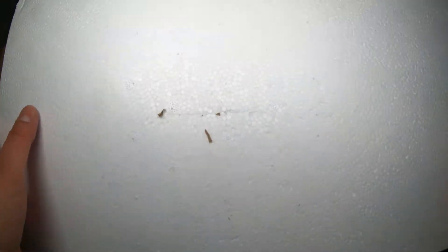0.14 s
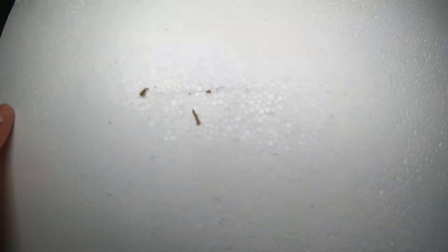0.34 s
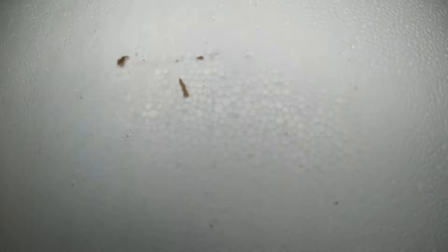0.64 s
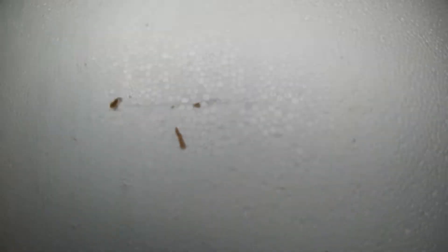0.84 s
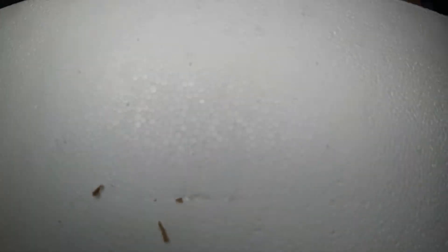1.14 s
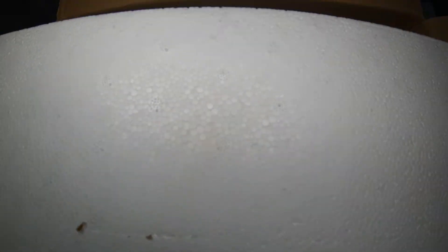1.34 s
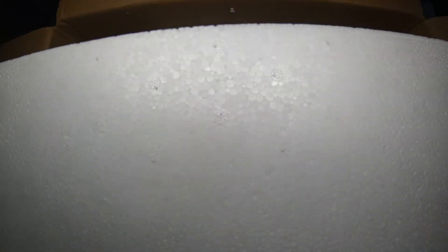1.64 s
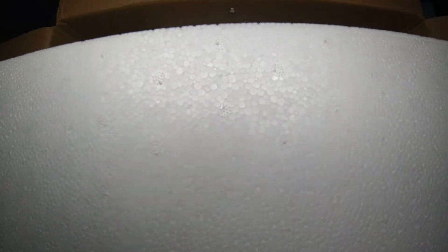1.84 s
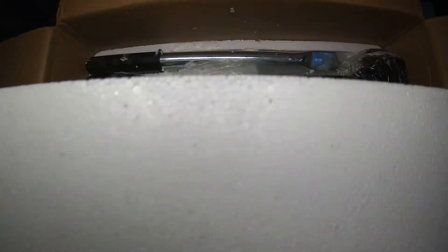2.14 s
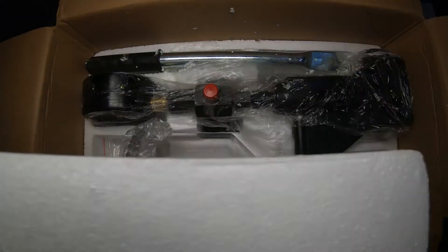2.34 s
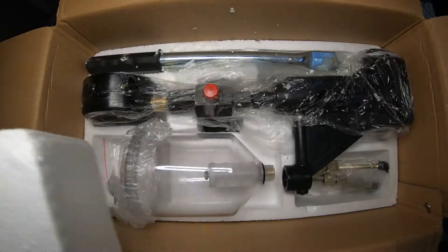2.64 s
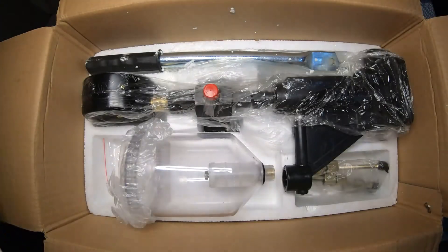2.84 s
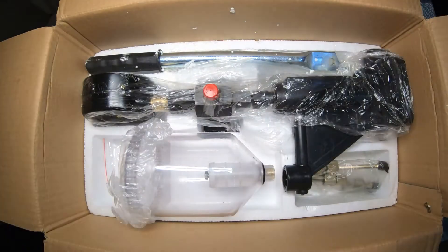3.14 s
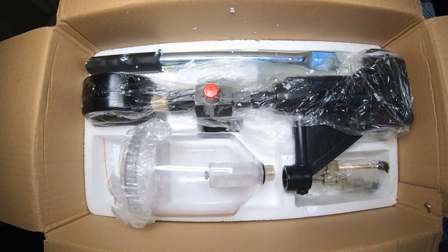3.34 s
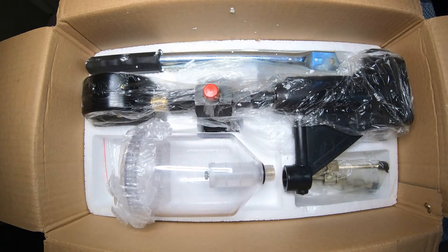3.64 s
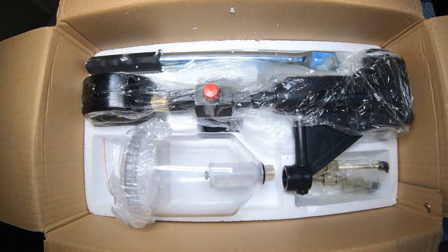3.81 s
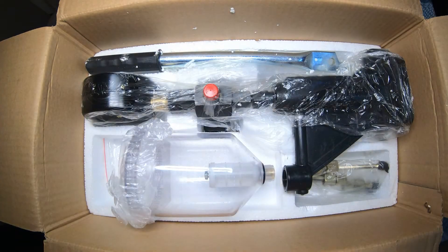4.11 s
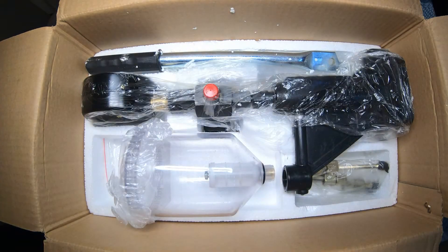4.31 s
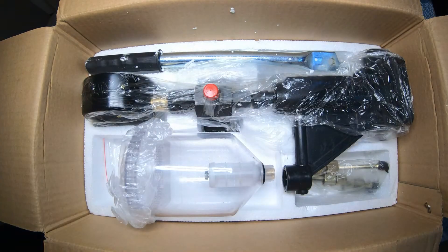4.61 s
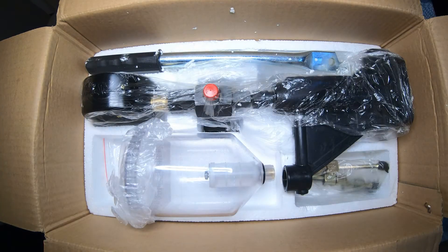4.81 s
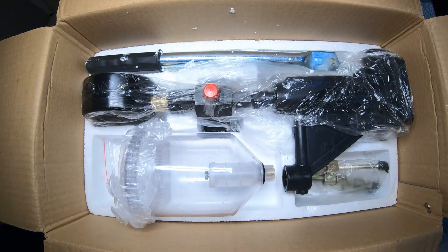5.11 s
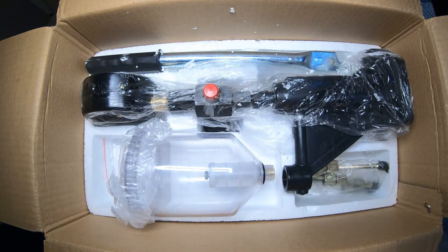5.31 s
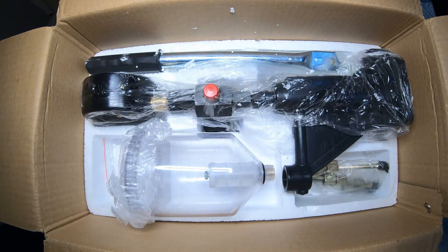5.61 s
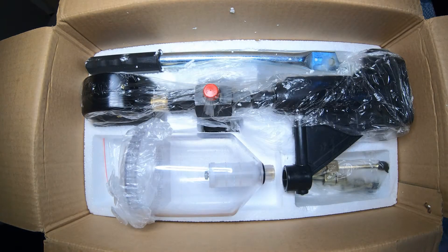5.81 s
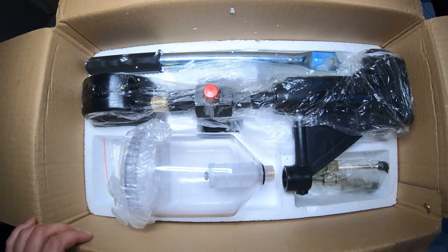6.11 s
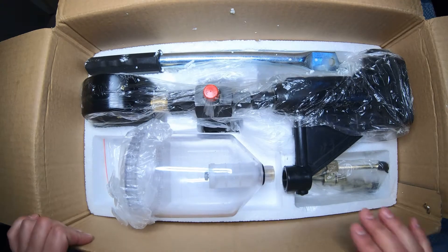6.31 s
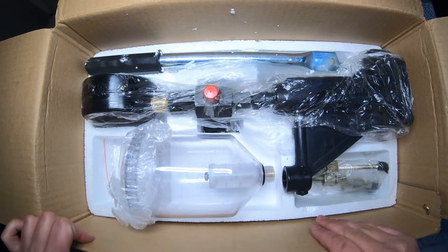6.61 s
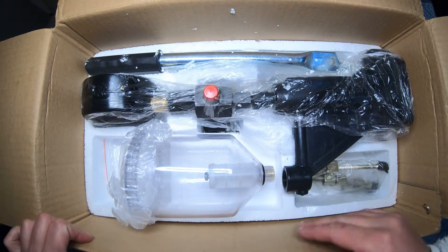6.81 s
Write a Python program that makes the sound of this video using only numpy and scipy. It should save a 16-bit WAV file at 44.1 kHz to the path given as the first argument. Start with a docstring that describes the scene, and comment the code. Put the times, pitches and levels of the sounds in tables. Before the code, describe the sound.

Polystyrene foam squeaks and rasps out of a cardboard box, followed by lighter scraping and hollow knocks on the flaps.

```python
"""In a small, quiet room, a polystyrene foam lid is tugged out of a cardboard box near the microphone.
Stick-slip friction makes it squeak, rasp and judder along the walls. It comes free, bounces on a flap,
slides down beside the box and bumps to rest; then hands brush and knock the flaps.
Each rub is one stroke that swells, holds and dies away; each bump rings the damped modes of the box."""
import sys
import numpy as np
from scipy import signal
from scipy.fft import rfft, irfft, next_fast_len
from scipy.io import wavfile
from scipy.ndimage import uniform_filter1d, map_coordinates

SR = 44100
rng = np.random.default_rng(int(sys.argv[2]) if len(sys.argv) > 2 else 0)


def digitize_waveform(pressure):
    """Quantize a signal to 16-bit integers and store it at the path in sys.argv[1].

    Rows of a 2-D input are taken as channels; values are limited to [-1, 1].
    """
    field = np.atleast_2d(pressure).T
    bounded = np.clip(field, -1, 1)
    quanta = np.round(bounded * 32767).astype(np.int16)
    wavfile.write(sys.argv[1], SR, quanta)


N = 306495

# Position of the contact: (time [s], left minus right [dB])
CONTACT_PAN = [(0.0, 1), (0.66, 0.5), (0.75, -0.5), (0.99, 0), (1.31, -0.5), (1.39, 3.5), (1.51, 0),
               (2.65, 3), (2.88, -4), (3.72, 2.5), (5.34, 2), (5.57, -4), (6.04, 1), (6.95, 2)]
# Spectra of room air, tight rubbing, light rubbing and edge ticks: (frequency [Hz], relative density [dB])
AIR_SPECTRUM = [(15, -36), (25, -15), (68, -11.5), (91, -32.5), (189, -4.5), (235, -6), (392, -16.5),
                (449, -20), (857, -19), (1060, -24), (2200, -23), (2660, -24.5), (7630, -25), (14600, -39),
                (15800, -42)]
TUG_SPECTRUM = [(15, -35), (25, -2), (53, 2.5), (126, -1.5), (211, -9.5), (307, -7), (342, -9),
                (905, -13.5), (1250, -11.5), (1510, -10.5), (3050, -5), (5820, -8), (8050, -4.5),
                (10500, -9), (15800, -23)]
BRUSH_SPECTRUM = [(35, -47), (60, -11), (91, -28), (211, -1.5), (345, -4), (388, 2), (489, 2), (632, 3.5),
                  (1610, -4.5), (3900, -2.5), (5930, -6.5), (7850, -1.5), (10900, -8), (13100, -12.5),
                  (15800, -27)]
TICK_SPECTRUM = [(88, -56), (150, -7), (1300, -3.5), (2120, -8.5), (3590, -2.5), (6570, -6.5), (7530, -2),
                 (8810, -10.5), (13300, -19), (15800, -61)]
# Likeness of left and right: (frequency [Hz], correlation [ratio])
COHERENCE = [(100, 0.86), (300, 0.87), (600, 0.67), (1200, 0.24), (2200, 0.49), (4500, 0.64), (8000, 0.047),
             (14000, 0.11)]
# Tugs on the tight lid: (start [s], attack [s], length [s], release T60 [s], rasp [dB],
# hiss over rasp [dB], board over rasp [dB], wall rumble over rasp [dB])
TUG_STROKES = [(0.0, 0.0017, 0.063, 0.96, -26.5, -0.5, -10, -4.5),
               (0.09, .08, 0.19, 1, -29.5, -8, -13, -21.5), (0.35, 0.01, 0.025, 0.39, -35, 2, -6, -15),
               (0.425, 0.087, .11, 0.15, -28, 1.5, -8, -16),
               (0.555, 0.044, 0.25, 0.1, -31.5, -2, -6.5, -14), (1.055, .02, .06, 0.25, -57, -3, -2, -18),
               (1.11, 0.028, 0.051, 0.34, -43.5, 2, -9, -24), (1.26, 0.012, 0.033, 0.17, -49, -7, -3, -11),
               (1.35, .04, 0.097, .1, -53, -4, -2.5, -10),
               (1.438, 0.0089, 0.08, 0.55, -30.5, -11.5, -1, 4.5), (1.55, .09, 0.13, 0.18, -23, -3, -9, -5),
               (1.71, 0.015, 0.06, 0.13, -36.5, 3, -2.5, -4.5), (1.79, .02, 0.068, 0.15, -39.5, -1, 0, 4),
               (1.865, 0.019, 0.072, .15, -33, 0.5, -4.5, -26),
               (1.932, 0.021, 0.053, 0.27, -23.5, -4.5, -9.5, -24),
               (1.99, 0.025, 0.064, 0.4, -28.5, -3.5, -6.5, -14),
               (2.07, 0.033, .12, 0.064, -35, 3, -15, -5.5),
               (2.319, 0.0046, 0.049, 0.077, -38, 11.5, -11, 3),
               (2.378, 0.011, 0.13, 0.14, -30, 0.5, -8.5, -4.5),
               (2.515, 0.024, 0.058, 0.11, -37, 3, -0.5, -1), (2.605, .015, 0.051, 0.051, -44, 9, -7, -12),
               (2.672, 0.0079, 0.067, 0.15, -38, -3, -4, -12)]
# The foam lets go: (time [s], level [dB], length [s], squawk [Hz], squawk over chatter [dB])
SLIP_BURSTS = [(0.009, -22, 0.015, 3300, 12), (0.047, -21.5, 0.017, 3800, 19),
               (0.448, -23, 0.022, 8400, -2), (0.592, -20, 0.018, 2460, -2), (0.648, -19.5, 0.013, 1880, 2),
               (1.416, -28.5, 0.0096, 2190, 4), (1.441, -21.5, 0.013, 2350, -0.5),
               (1.573, -26.5, 0.048, 1250, 9), (2.135, -25, 0.013, 4200, -3),
               (2.263, -35, 0.021, 6500, -13), (2.335, -21, 0.0026, 2870, 10),
               (2.353, -25, 0.0065, 7500, 8), (2.379, -14.5, 0.0041, 6300, 5),
               (2.484, -21.5, 0.014, 3850, -5), (2.528, -24, 0.016, 4000, -9),
               (2.564, -20, 0.0083, 4500, -13), (2.619, -20, 0.0046, 8250, 11),
               (2.639, -21.5, 0.0074, 7650, 6), (2.681, -24.5, 0.03, 8000, -3),
               (2.702, -22, 0.0069, 2200, 1), (3.41, -20, 0.016, 8140, 1), (3.456, -17, 0.0092, 7440, -25),
               (4.034, -22, 0.032, 8400, -7), (5.311, -25.5, 0.028, 8030, 3)]
# Bumps on the box: (time [s], flap [dB], deep wall [dB], hard knock [dB], pitch of the panel [ratio])
BOX_IMPACTS = [(0.019, -25.5, -17.5, -40, 1.22), (0.639, -31.5, -22.5, -54, 1), (0.940, -52.5, -71, -40, 1),
               (1.460, -25, -16, -20.5, 1.1), (1.63, -23, -21, -16.5, 1), (2.038, -23.5, -44, -21.5, 0.93),
               (2.266, -39, -46, -62, 0.95), (2.382, -26.5, -33, -52, 0.94), (3.417, -29, -26, -29, 1.33),
               (3.464, -29, -27, -29, 0.9), (3.509, -27.5, -58, -33, 1.435), (4.012, -38.5, -55, -24, 1.17),
               (4.898, -12, -50, -15, 1.1), (4.917, -15.5, -37, -18, 1.078), (4.950, -24, -27, -20, 0.93),
               (5.287, -22, -26, -20.5, 1.4), (5.318, -26.5, -28, -28, 0.96),
               (5.364, -26.5, -17, -21.5, 1.01), (5.411, -35, -29, -29.5, 0.99),
               (5.510, -36.5, -56, -55, 1), (5.591, -34.5, -62, -43, 1.034), (6.028, -37, -25, -22, 1.08),
               (6.046, -40, -24.5, -49, 1.6), (6.104, -32.5, -19.5, -25.5, 1.13),
               (6.255, -25.5, -29, -9, 0.99), (6.524, -40, -19.5, -51, 1), (6.547, -40, -29, -30, 1.1),
               (6.648, -36.5, -37, -61, 1.04), (6.825, -39, -41, -42, 1.26), (6.87, -35, -37, -40, 1.2)]
# Modes of the box: (frequency [Hz], level [dB], T60 [s])
BOX_MODES = [(45, -8, 0.13), (67, -3, 0.18), (102.8, -7.5, 0.23), (146.9, 1.5, 0.15), (199.5, -8.5, 0.098),
             (269, -1, 0.084), (381, -3, 0.062), (515, -1.5, 0.035), (668, -12.5, 0.058),
             (786, -14.5, 0.077), (1220, -16, 0.029), (1320, -25, 0.063), (1610, -18, .06)]
# The foam sings as its slips lock into step: (time [s], pitch [Hz])
SQUEAK_PITCH = [(0.035, 3100), (0.072, 4760), (0.107, 5100), (0.122, 5150), (0.128, 4530), (0.141, 4450),
                (0.151, 5100), (0.162, 5250), (0.19, 5150)]
# Sharp contacts of edge on board: (time [s], level [dB], treble [dB])
EDGE_CONTACTS = [(1.233, -28, 5), (2.037, -22.5, -21), (3.507, -16, -12), (3.66, -20.5, -30),
                 (3.745, -20, -19), (4.01, -17, 3), (5.285, -14, -6), (6.027, -19.5, -20),
                 (6.107, -27, -19), (6.254, -15.5, 1), (6.521, -31, -8), (6.717, -35.5, 12)]
# Cardboard under the dragging edge: (time [s], length [s], first pitch [Hz], last pitch [Hz], level [dB])
HOOT_GLIDES = [(2.563, 0.024, 1400, 1420, -42), (3.867, 0.027, 405, 414, -44), (4.001, .015, 634, 663, -36),
               (4.075, 0.0483, 1137, 902, -33.5), (4.157, 0.02, 708, 706, -40),
               (4.211, 0.038, 697, 691, -36.5), (5.389, 0.032, 820, 715, -37.5),
               (6.254, .008, 1650, 1610, -37)]
# Each bounce shakes the box: (flap [dB], deep wall [dB], hard knock [dB], pitch of the panel [ratio])
BOUNCE_IMPACT = (-42, -50, -33, 4)
# Foam or hand passing lightly over cardboard: (start [s], attack [s], length [s], release T60 [s],
# rasp [dB], hiss over rasp [dB], board over rasp [dB])
BRUSH_STROKES = [(2.955, 0.011, 0.023, 0.9, -40.5, -8, -3.5), (3.055, 0.041, 0.052, 0.29, -33, 0.5, 0),
                 (3.16, 0.018, 0.041, 0.34, -36, -1.5, -7), (3.22, 0.08, 0.21, .1, -33.5, -2.5, -5),
                 (3.415, 0.0032, 0.059, 0.17, -32.5, 7.5, -3.5), (3.5, 0.0068, 0.0075, 0.15, -29, 1, 1),
                 (3.53, 0.069, .21, 0.28, -35, 13, -10.5), (3.75, 0.067, 0.23, 0.48, -33, 0.5, -3.5),
                 (3.955, 0.053, 0.15, 0.31, -29, -0.5, -5.5), (4.15, 0.0079, 0.023, 0.27, -34, -19, -1.5),
                 (4.213, 0.0033, .05, 0.37, -32.5, -1.5, -7), (4.3, 0.034, 0.19, 0.19, -35.5, -13, -3),
                 (4.49, 0.0083, 0.12, 0.36, -36.5, -3, -10.5), (4.63, 0.02, 0.13, 0.18, -35.5, -6, -4),
                 (4.755, 0.019, 0.072, 0.69, -35.5, -1, -9), (4.98, 0.004, 0.23, .3, -38, -1.5, -9.5),
                 (5.285, .008, 0.03, 0.5, -30.5, -2.5, -4), (5.44, 0.021, 0.026, 0.59, -40.5, -15, -14),
                 (6.035, 0.024, 0.078, .1, -49, 9.5, -1), (6.104, 0.01, 0.13, 0.53, -37.5, 2, -4),
                 (6.36, 0.022, .14, .3, -52, -8, -10), (6.512, 0.021, 0.078, 0.24, -41.5, 2.5, -3),
                 (6.64, 0.01, 0.018, 1, -47, -13, -8), (6.805, 0.029, 0.054, 0.43, -34.5, -1.5, -6.5)]
# Reverberation time: (frequency [Hz], T60 [s])
ROOM_DECAY = [(150, 0.42), (320, 0.58), (600, 0.54), (2000, 0.37), (6000, 0.3), (14000, 0.19)]
# Room resonances: (frequency [Hz], level [dB])
STANDING_WAVES = [(150, -13.5), (265, -9), (315, 8), (400, -1)]
# Imbalance of the microphone ports: (frequency [Hz], left minus right [dB])
PORT_BALANCE = [(300, -0.79), (1100, 0.41), (2200, -1.3), (4500, -0.5), (8000, 1.8), (14000, 0.6)]


def amp(db):
    """Decibels to amplitude ratio."""
    return 10 ** (np.asarray(db) / 20)


def unit(x):
    """Normalise to rms 1."""
    return x / np.sqrt(np.mean(x ** 2) + 1e-20)


def along(points, hz):
    """Interpolate (frequency, value) points on a logarithmic axis."""
    f, v = np.transpose(points)
    return np.interp(np.log(hz + 1), np.log(f + 1), v)


def curve(points):
    """Interpolate (time, value) points at every sample."""
    return np.interp(np.arange(N) / SR, *np.transpose(points))


def wobble(rate):
    """Smooth random modulation with rate knots a second."""
    return map_coordinates(rng.standard_normal(int(N * rate / SR) + 4), [np.arange(N) * rate / SR])


def noise(n=N):
    """Two uncorrelated white noises."""
    return rng.standard_normal((2, n))


def filtered(x, response):
    """Linear filtering: multiply the spectrum by a frequency response."""
    n = x.shape[-1]
    m = next_fast_len(n + 4096)
    return irfft(rfft(x, m) * response(np.fft.rfftfreq(m, 1 / SR)), m)[..., :n]


def band(hz, lo_hz, hi_hz):
    """Band-pass gain with fourth-order skirts."""
    return 1 / np.sqrt((1 + (lo_hz / (hz + 1)) ** 8) * (1 + (hz / hi_hz) ** 8))


def resonance(hz, centre_hz, q):
    """Complex response of a damped oscillator."""
    return 1j * hz * centre_hz / q / (centre_hz ** 2 - hz ** 2 + 1j * hz * centre_hz / q)


def stereo(pair, response):
    """Partial coherence: two unrelated signals, filtered, blend into left and right at rms 1."""
    turn = lambda hz: np.arccos(np.clip(along(COHERENCE, hz), -1, 1)) / 2
    mid, side = filtered(pair, lambda hz: response(hz) * np.array([np.cos(turn(hz)), np.sin(turn(hz))]))
    return unit(np.array([mid + side, mid - side]))


def coloured_band(pair, spectrum, lo_hz, hi_hz):
    """Source and filter: one band of a spectrum, in stereo at rms 1."""
    return stereo(pair, lambda hz: amp(along(spectrum, hz)) * band(hz, lo_hz, hi_hz))


def add(track, s, sound):
    """Superpose a sound on the track at time s."""
    stretch = track[:, max(round(s * SR), 0):][:, :sound.shape[-1]]
    stretch += sound[..., :stretch.shape[-1]]


def envelope(t, attack, length, t60, sag_db_per_s=8):
    """Linear rise, slow sag, then exponential decay once the length is over."""
    return np.clip(t / attack, 0, 1) * amp(-sag_db_per_s * t - 60 * np.maximum(t - length, 0) / t60)


def strokes(rows):
    """Incoherent addition: overlapping strokes sum in power, giving a gain curve for each part."""
    power, t = np.zeros((len(rows[0][4:]), N)), np.arange(SR) / SR
    for s, attack, length, t60, rasp_db, *parts_db in rows:
        gains = amp(rasp_db + np.array([0, *parts_db]))[:, None]
        add(power, s, (gains * envelope(t, attack, length, t60)) ** 2)
    return np.sqrt(power)


def background(air_db=-56.5, hiss_db=-50):
    """Ambient noise: steady room air, and a thin band of hiss that fades early."""
    air = stereo(noise(), lambda hz: amp(along(AIR_SPECTRUM, hz)))
    hiss = stereo(noise(), lambda hz: resonance(hz, 4300, q=4.3) ** 2)
    fade = envelope(np.arange(N) / SR, attack=.1, length=1.15, t60=0.81)
    return amp(air_db) * air + amp(hiss_db) * fade * hiss


def beads(rate, scatter_db, catch_rate, catch_db, patchy_db):
    """Shot noise: foam beads snap free in clumps; the shifting contact favours ever new pitches."""
    snaps = (rng.random(N) < rate / SR) * amp(scatter_db * rng.standard_normal(N))
    spectra = signal.stft(snaps * noise(), nperseg=1024)[2]
    patches = uniform_filter1d(rng.standard_normal(spectra.shape[1:]), size=3, axis=0)  # over frequency
    patches = uniform_filter1d(patches, size=9, axis=1)  # over time
    force = signal.istft(spectra * amp(patchy_db * unit(patches)), nperseg=1024)[1][:, :N]
    return force * amp(catch_db * wobble(catch_rate))


def grip(rate, depth_db):
    """Amplitude modulation by the uneven pressure of a hand."""
    return amp(depth_db * wobble(rate))


def rubbing(force, spectrum, rasp, hiss, board):
    """Friction radiates in three bands: from the cardboard, the foam's body and its surface."""
    return (board * coloured_band(force, spectrum, 200, 1300)
            + rasp * coloured_band(force, spectrum, 1300, 5500)
            + hiss * coloured_band(force, spectrum, 5500, 17000))


def chirps(per_s=90, pitch_hz=3200, spread=.3, life_s=0.0048, glide=0.0624, scatter_db=5.8):
    """Local stick-slip: small patches of foam squeak briefly, each at its own gliding pitch."""
    count = int(per_s * N / SR)
    pitch, size, bend = rng.standard_normal((count, 3)).T[:, :, None]
    start = (rng.random((count, 1)) * N).astype(int)
    age = np.arange(SR // 25) / SR / life_s
    hz = pitch_hz * np.exp(spread * pitch) * (1 + glide * bend * np.tanh(age / 2))
    grains = amp(scatter_db * size) * age * np.exp(-age) * np.sin(2 * np.pi * np.cumsum(hz, axis=1) / SR)
    samples = start + np.arange(len(age))
    return unit(np.bincount(samples.ravel(), grains.ravel(), N)[:N])


def tugs(judder_hz=120, chirp_db=-7.5, shake_db=-4):
    """Stick-slip friction: the tight lid catches at an uneven rate, rasps, chirps and shakes the walls."""
    rasp, hiss, board, rumble = strokes(TUG_STROKES)
    slip_hz = judder_hz * np.exp(.25 * wobble(30))
    judder = np.cos(2 * np.pi * np.cumsum(slip_hz) / SR)
    force = beads(rate=12000, scatter_db=1.0, catch_rate=260, catch_db=1.45, patchy_db=4.0)
    force *= grip(rate=51, depth_db=0.4)
    walls = unit(coloured_band(noise(), TUG_SPECTRUM, 27, 280) + amp(shake_db) * judder)
    friction = rubbing(force, TUG_SPECTRUM, rasp, hiss, board)
    return friction + amp(chirp_db) * rasp * chirps() + rumble * walls


def slips(rise_s=0.0028, fall_t60=0.03, chatter_db=1.5):
    """Noise-driven resonance: as the foam lets go, a burst of broad chatter excites one squawk."""
    out, t = np.zeros((2, N)), np.arange(SR // 8) / SR
    unevenness = amp(chatter_db * wobble(600))
    for s, db, length, squawk_hz, share_db in SLIP_BURSTS:
        force = noise(len(t)) * unevenness[round(s * SR):][:len(t)]
        chatter = coloured_band(force, TUG_SPECTRUM, 610, 17000)
        squawk = stereo(force, lambda hz: resonance(hz, squawk_hz, q=6))
        shape = (1 - np.exp(-t / rise_s)) * amp(-60 * np.maximum(t - length, 0) / fall_t60)
        add(out, s, amp(db) * shape * unit(chatter + amp(share_db) * squawk))
    return out


def bumps(rise_s=0.0028):
    """Modal vibration: each bump rings the cardboard's damped modes; soft ones reach only the low modes."""
    out, t = np.zeros((2, N)), np.arange(SR // 2) / SR
    hz, mode_db, t60 = np.transpose(BOX_MODES)[:, :, None]
    signs = (-1) ** np.arange(len(BOX_MODES))
    impacts = BOX_IMPACTS + [(s, *BOUNCE_IMPACT) for s in bounce_times()]
    for s, flap_db, deep_db, knock_db, ratio in impacts:
        drive_db = along([(75, deep_db), (140, flap_db), (200, flap_db), (390, knock_db)], hz)
        # loose panels chafe, so their ring drifts in phase
        drift = .2 * np.cumsum(rng.standard_normal((len(hz), len(t))), axis=1) * np.sqrt(hz / SR)
        decay = amp(drive_db + mode_db + rng.standard_normal(hz.shape) - 60 * t / t60)
        ring = decay * np.sin(2 * np.pi * ratio * hz * t + drift)
        add(out, s, signs @ ring * (1 - np.exp(-t / rise_s)))
    return out


def squeak(level_db=-18.0, lock_s=.102, peak_s=0.13, octave_s=.156, release_s=0.17, release_t60=0.15):
    """Self-excited oscillation: ragged stick-slip locks into a whistle that gains a second harmonic."""
    t = np.arange(N) / SR
    swell_db = -105 * np.maximum(peak_s - t, 0)
    release_db = -60 * np.clip(t - release_s, 0, 1) / release_t60
    jitter = np.interp(t, [lock_s - .02, lock_s + .01], [.045, .011])
    octave_db = np.interp(t, [octave_s - .005, octave_s + .005], [-33, -15])
    phase = 2 * np.pi * np.cumsum(curve(SQUEAK_PITCH) * (1 + jitter * wobble(1100))) / SR
    tone = np.sqrt(2) * (np.sin(phase) + amp(octave_db) * np.sin(2 * phase))
    flutter_db = 1.6 * wobble(352)
    return tone * amp(level_db + swell_db + release_db + flutter_db) * (t > SQUEAK_PITCH[0][0])


def ticks(rise_s=0.0011, crack_t60=0.019, rattle_db=-15, rattle_t60=0.12,
          bounce_db=-19.5, bounce_step_db=0.2, bounce_treble_db=-5):
    """Impact transient: an edge snaps against the board, with a crack and a short rattle in the box."""
    out, t = np.zeros((2, N)), np.arange(SR // 8) / SR
    shape = (1 - np.exp(-t / rise_s)) * (amp(-60 * t / crack_t60) + amp(rattle_db - 60 * t / rattle_t60))
    bounces = [(s, bounce_db + bounce_step_db * k, bounce_treble_db) for k, s in enumerate(bounce_times())]
    for s, db, treble_db in EDGE_CONTACTS + bounces:
        tilt = [(2000, 0), (7000, treble_db)]
        crack = stereo(noise(len(t)), lambda hz: amp(along(TICK_SPECTRUM, hz) + along(tilt, hz)))
        add(out, s, amp(db) * crack * shape)
    return out


def hoots(width_hz=260, attack_s=0.0042, release_t60=0.16):
    """Narrow-band noise: a rough resonance of the board glides with the contact point."""
    out, t = np.zeros((2, N)), np.arange(SR // 4) / SR
    flutter = unit(wobble(width_hz)) + 1j * unit(wobble(width_hz))
    for s, length, first_hz, last_hz, db in HOOT_GLIDES:
        phase = 2 * np.pi * np.cumsum(np.interp(t, [0, length], [first_hz, last_hz])) / SR
        hoot = np.real(flutter[round(s * SR):][:len(t)] * np.exp(1j * phase))
        add(out, s, amp(db) * envelope(t, attack_s, length, release_t60) * hoot)
    return out


def bounce_times(first_s=2.883, flight_s=.033, restitution=.79, count=4):
    """Inelastic collision: the freed lid bounces on a flap, its flights shrinking geometrically."""
    return [first_s + flight_s * (1 - restitution ** k) / (1 - restitution) for k in range(count)]


def brushes(walls_db=-15.0):
    """Sliding friction: light, fast contact makes denser snaps and so a finer hiss."""
    rasp, hiss, board = strokes(BRUSH_STROKES)
    force = beads(rate=22000, scatter_db=3.0, catch_rate=230, catch_db=0.47, patchy_db=3.0)
    force *= grip(rate=33, depth_db=0.33)
    walls = stereo(noise(), lambda hz: band(hz, 160, 227))
    return rubbing(force, BRUSH_SPECTRUM, rasp, hiss, board) + amp(walls_db) * board * walls


def room(x):
    """Reverberation: standing waves linger in the bass while the treble dies fast."""
    hz, t, spectra = signal.stft(noise(SR // 2), SR, nperseg=256)
    decay = amp(-60 * t / along(ROOM_DECAY, hz)[:, None])
    tail = signal.istft(spectra * decay, SR, nperseg=256)[1]
    tail = stereo(tail, lambda hz: 1 + sum(amp(db) * resonance(hz, f, q=12) for f, db in STANDING_WAVES))
    tail = np.pad(tail / np.linalg.norm(tail[0]), ((0, 0), (SR // 200, 0)))  # arrives 5 ms late
    return signal.fftconvolve(x, tail, axes=1)[:, :N]


def scene():
    """Superposition: friction moves with the contact point; the squeak and the box stay central."""
    pan_db = curve(CONTACT_PAN)
    contact = tugs() + brushes() + slips() + ticks() + hoots()
    foam = contact * amp(np.array([pan_db, -pan_db]) / 2) + squeak()
    box = bumps()
    return foam + box + room(amp(-16.5) * foam + amp(-17) * box) + background()


def record(dry, ceiling=.55, lead_s=1.1e-5, top_hz=15900):
    """Soft saturation and band limiting; the left port leads a touch and favours the high treble."""
    half = np.array([[.5], [-.5]])
    rounded = dry / (1 + (dry / ceiling) ** 4) ** .25
    ports = lambda hz: amp(half * along(PORT_BALANCE, hz)) * np.exp(2j * np.pi * hz * lead_s * half)
    return filtered(rounded, lambda hz: ports(hz) * (hz < top_hz))


dry = scene()
out = record(dry)
digitize_waveform(out)
```